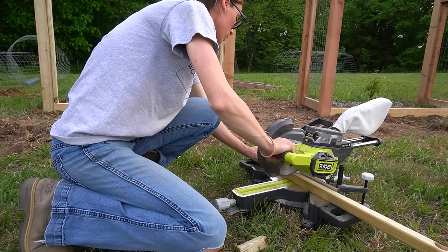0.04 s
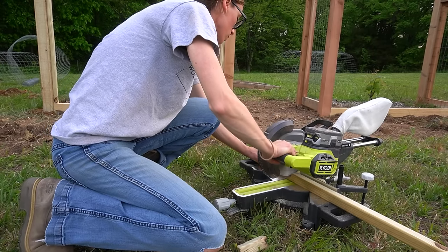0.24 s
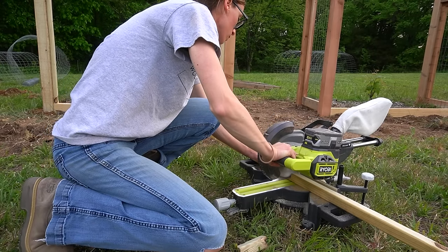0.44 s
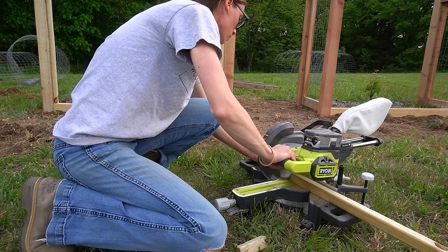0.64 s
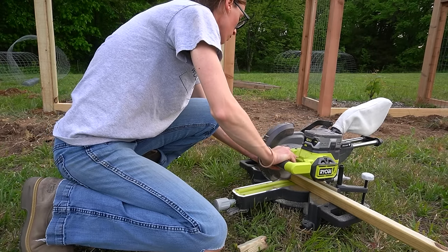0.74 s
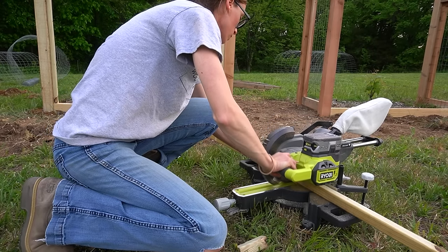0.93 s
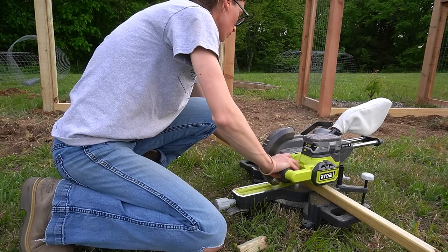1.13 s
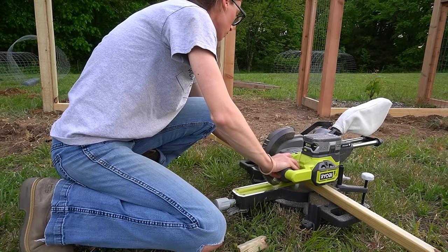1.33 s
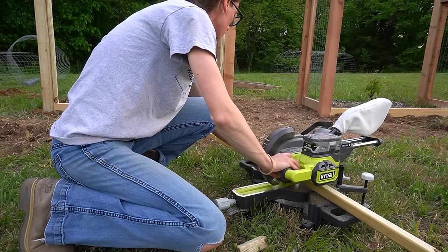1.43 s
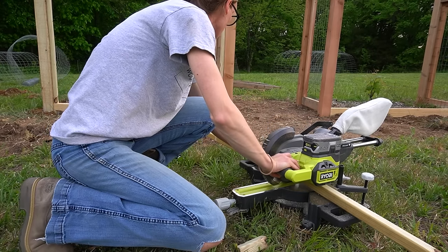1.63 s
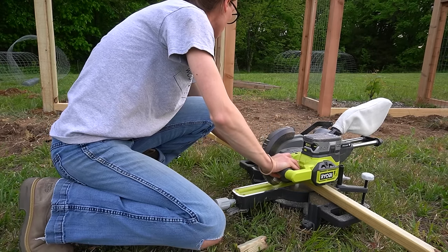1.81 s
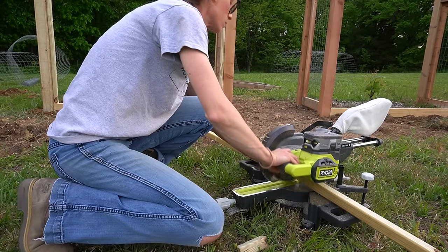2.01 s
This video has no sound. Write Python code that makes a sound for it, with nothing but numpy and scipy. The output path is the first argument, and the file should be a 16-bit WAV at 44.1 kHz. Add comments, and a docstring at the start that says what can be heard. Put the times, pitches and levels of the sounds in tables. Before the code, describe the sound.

Miter saw finishing a cut in wood, harsh and hissy, then spinning down with a fluttering, descending whine

```python
"""On a lawn, a miter saw cuts through a wooden batten while a distant engine hums.
Chip noise modulated by the teeth makes the rasp; resonated noise makes the blade ring.
Free of the wood the saw speeds up, the trigger clicks off, and the whine (harmonics of the tooth rate)
falls through the resonances of blade and guard while the blade flutters against the kerf."""
import sys
import numpy as np
from scipy import signal
from scipy.fft import rfft, irfft, next_fast_len
from scipy.io import wavfile

SR = 44100
rng = np.random.default_rng(int(sys.argv[2]) if len(sys.argv) > 2 else 0)


def to_wav(s):
    """Save 16-bit WAV."""
    ch = np.atleast_2d(s).T  # columns
    pcm = np.round(np.clip(ch, -1, 1) * 32767)  # PCM
    wavfile.write(sys.argv[1], SR, pcm.astype(np.int16))


N = 90978
T = np.arange(N) / SR
SIZE = next_fast_len(N + 4096)
F = np.maximum(np.arange(SIZE // 2 + 1) * SR / SIZE, 1)
CUT_END_S = 0.97


def undb(db):
    """Decibels to gain."""
    return 10 ** (np.asarray(db) / 20)


def unit(x):
    """Scale to rms 1."""
    return x / np.sqrt(np.mean(x ** 2))


def curve(rows, axis=1):
    """One column of a table, joined by straight lines in time."""
    rows = np.array(rows)
    return np.interp(T, rows[:, 0], rows[:, axis])


def across(rows):
    """Points joined on a log-frequency axis."""
    rows = np.array(rows)
    return np.interp(np.log(F), np.log(np.maximum(rows[:, 0], 1)), rows[:, 1])


def shape(x, gain):
    """Filter with a gain for each frequency."""
    return irfft(rfft(x, SIZE) * gain, SIZE)[..., :N]


def noise():
    """White noise."""
    return rng.standard_normal(N)


def walk(rate_hz):
    """Smooth chance of spread 1: low-passed noise."""
    return unit(shape(noise(), 1 / (1 + (F / rate_hz) ** 4)))


def resonance(hz, width_hz):
    """Gain of one resonance, 1 at its centre."""
    return 1 / np.hypot(1, (F / hz - hz / F) * hz / width_hz)


def ringing(hz, width_hz):
    """A mode kept ringing by random knocks, rms 1."""
    return unit(shape(noise(), resonance(hz, width_hz) ** 2))


def after(start_s):
    """Seconds since a moment, 0 before it."""
    return np.maximum(T - start_s, 0)


def tone(phase):
    """Sinusoid of rms 1."""
    return np.sqrt(2) * np.cos(phase)


# engine lines: pitch_hz, relative_db
ENGINE_LINES = [(57.5,-12.5),(86,-8.5),(113.2,2.5),(144.5,-8.5),(173,-38),(222.5,-4),(229,-17)]
# hum level: time_s, level_db
HUM_LEVEL = [(0,-75.5),(.95,-75.5),(1.4,-68.5),(1.8,-65.5),(2.06,-62.5)]
# outdoor noise colour: freq_hz, relative_db
OUTDOOR_COLOUR = [(25,-22.5),(70,6),(130,4.5),(230,7.5),(400,-6),(600,-16.5),(850,-8),(1500,-7),(5000,-27),(15000,-54)]
OUTDOORS_RE_HUM_DB = -9.5
THROB_HZ, THROB_PEAK_S, THROB_DEPTH = 4.65, 1.782, 0.65


def distance():
    """A far engine: throbbing steady lines, over soft outdoor noise that rises with the hum."""
    throb_growth = np.clip(T / THROB_PEAK_S, 0, 1)
    throb = 1 + THROB_DEPTH * np.cos(2 * np.pi * THROB_HZ * (T - THROB_PEAK_S)) * throb_growth
    lines = 0
    for hz, db in ENGINE_LINES:
        phase = 2 * np.pi * (hz * T + rng.random()) + 0.1 * walk(5.15)
        lines = lines + undb(db) * np.cos(phase)
    hum = unit(throb * lines)
    outdoors = unit(shape(noise(), undb(across(OUTDOOR_COLOUR))))
    return (hum + undb(OUTDOORS_RE_HUM_DB) * outdoors) * undb(curve(HUM_LEVEL))


# motor speed under load: time_s, speed_turns_per_s
LOADED_SPEED = [(0.0, 403), (0.17, 391), (0.362, 354.8), (0.448, 353.2), (0.486, 343.5), (0.82, 344.4),
                (0.928, 327.2), (0.944, 313.2), (0.97, 311.6)]
# motor speed, blade free: time_s, speed_turns_per_s
FREE_SPEED = [(0.99,315.3),(1.058,356),(1.126,385),(1.188,359.3),(1.4,265.5),(1.53,215.7),(1.6,193),(1.668,170.5),(1.73,152),(1.784,135.5),(1.836,120.3),(1.9,103.8),(1.94,96),(2.06,73)]
WAVER = 0.0015  # rms share of speed


def motor():
    """Turns per second: the speed changes by a steady share each second from point to point."""
    rows = np.array([*LOADED_SPEED, *FREE_SPEED])
    speed = np.exp(np.interp(T, rows[:, 0], np.log(rows[:, 1])))
    return speed * (1 + WAVER * walk(51))


REPEAT_SPREAD_DB, REPEAT_DRIFT_HZ = 4, 2.5


def tooth_pattern(sector):
    """Uneven teeth repeat each half sector: a comb following the speed, each line's level drifting at random."""
    comb = 0
    for k in range(6, 52):
        swell = undb(REPEAT_SPREAD_DB * walk(REPEAT_DRIFT_HZ)) / np.sqrt(k)
        comb = comb + swell * np.cos(2 * k * sector + 2 * np.pi * rng.random())
    return unit(comb)


# chip noise colour: freq_hz, relative_db
CHIP_COLOUR = [(180, -59), (300, -60), (477, -63.5), (519, -30), (573, -36), (665, -25.5), (825, -5.5),
               (1010, -21.5), (1150, -19.5), (1230, -4), (1360, -9), (1450, -8.5), (1770, -15.5),
               (2090, -9), (2470, -5), (3400, -5), (3660, -5.5), (3860, 0), (4410, -3), (4710, -3),
               (5740, -2), (6890, -2), (7490, 0), (9140, -2), (11700, 3), (15800, -5.5)]
TEETH_PER_SECTOR = 10
BITE_SHARE, BITE_SPREAD_DB, WOBBLE = 0.08, 1.08, 0.087
SPRAY_DB, REPEAT_DB = -4, -3.5  # re shared chip noise


def chip_noise(tooth):
    """Each tooth tears off a burst of chips; part of the pattern repeats with the blade's sectors. Stereo."""
    sector = tooth / TEETH_PER_SECTOR
    bite = (1 + BITE_SHARE * np.cos(tooth)) * undb(BITE_SPREAD_DB * walk(510))
    bite = bite * (1 + WOBBLE * (np.cos(sector) + np.cos(sector / 4)))
    spray = undb(SPRAY_DB) * np.array([noise(), noise()])  # independent left and right
    source = noise() + spray + undb(REPEAT_DB) * tooth_pattern(sector)
    return shape(source * bite, undb(across(CHIP_COLOUR)))


# blade modes: centre_hz, relative_db
BLADE_MODES = [(3881,-69),(4732,-50.5),(5949,-53),(7262,-66),(7477,-58.5),(9722,-58),(10724,-55)]


def blade_modes():
    """Random knocks keep the blade's modes ringing: narrow-band noise."""
    return sum(undb(db + 1.5) * ringing(hz, width_hz=51) for hz, db in BLADE_MODES)


# low bending modes: centre_hz, width_hz, relative_db
BENDING_MODES = [(800, 12, -0.5), (853, 7.3, -1.5), (830, 160, -1)]
# their summed level: time_s, level_db
BENDING_CURVE = [(0.0, -57.5), (0.168, -72.5), (0.422, -60.5), (0.48, -84), (0.526, -61), (0.778, -62.5),
                 (0.9, -51.5), (1.036, -72), (1.16, -101)]


def bending():
    """Low bending modes of the blade, rung by random knocks."""
    modes = unit(sum(undb(db) * ringing(hz, width_hz) for hz, width_hz, db in BENDING_MODES))
    tail_db = -60 * after(BENDING_CURVE[-1][0])  # 60 dB/s past the last point
    return modes * undb(curve(BENDING_CURVE) + tail_db)


# high scrape: time_s, level_db
SCRAPE_LEVEL = [(0,-44),(.14,-38.5),(.3,-42),(.55,-65),(.95,-56),(1.02,-100)]


def scrape():
    """A high scrape, strongest early in the cut: one band of resonated noise."""
    return ringing(11690, width_hz=390) * undb(curve(SCRAPE_LEVEL))


# cut bands before trim and end fall: time_s, hiss_db, rasp_db, body_db
CUT_BANDS = [(0.0,-33,-48,-52),(0.15,-35,-50.5,-59.5),(0.262,-36,-45,-61.5),(0.34,-34,-44.5,-51.5),(0.426,-34.5,-38.5,-55),(0.45,-33.5,-46,-53.5),(0.588,-33.5,-42,-50.5),(0.68,-33,-45,-47.5),(0.756,-33.5,-43.5,-51.5),(0.86,-32.5,-43,-46),(0.9,-37.5,-43.5,-51.5),(0.93,-33,-40.5,-46.5),(0.97,-37,-39.5,-51.5)]
BODY_TOP_HZ, RASP_TOP_HZ = 2300, 4730
HISS_TRIM_DB, RASP_TRIM_DB = -0.12, -1
HISS_FALL_DB_PER_S, RASP_FALL_DB_PER_S = 526, 197


def cut(tooth):
    """Chip noise in three bands with separate levels, plus ringing blade and scrape."""
    chips = chip_noise(tooth)
    below_hiss = 1 / (1 + (F / RASP_TOP_HZ) ** 8)
    below_rasp = 1 / (1 + (F / BODY_TOP_HZ) ** 8)
    rasp_fall_db = RASP_FALL_DB_PER_S * after(CUT_END_S)
    hiss_level = undb(curve(CUT_BANDS) - HISS_FALL_DB_PER_S * after(CUT_END_S))
    rasp_level = undb(curve(CUT_BANDS, axis=2) - rasp_fall_db)
    body_level = undb(curve(CUT_BANDS, axis=3) - rasp_fall_db)
    hiss = undb(HISS_TRIM_DB) * hiss_level * unit(shape(chips, 1 - below_hiss))
    rasp = undb(RASP_TRIM_DB) * rasp_level * unit(shape(chips, below_hiss - below_rasp))
    body = body_level * unit(shape(chips, below_rasp))
    mean_hiss = undb(np.mean(np.array(CUT_BANDS)[:, 1]))
    modes = blade_modes() * hiss_level / mean_hiss  # modes follow the hiss
    return hiss + rasp + body + modes + bending() + scrape()


# strike tone: time_s, level_db
STRIKE_LEVEL = [(0,-75),(.2,-54.5),(.32,-60),(.5,-58),(.68,-48),(.86,-52),(.95,-68),(1.02,-90),(1.1,-100)]
# harmonics 1 up: relative_db
STRIKE_STACK = [-2, -31.5, -19, -5.5]


def strike(tooth):
    """Teeth strike the wood at the tooth rate: a clear tone inside the rasp."""
    stack = sum(undb(db + 2 * walk(6.3)) * tone(k * tooth) for k, db in enumerate(STRIKE_STACK, 1))
    return undb(curve(STRIKE_LEVEL)) * stack


# flutter against the kerf: time_s, rate_hz, depth_0_to_1
FLUTTER_CURVE = [(1.1,150,.05),(1.22,146,.55),(1.29,136,.5),(1.35,125,.7),(1.4,122,.8),(1.44,122,.2),(1.6,100,.08),(2.06,70,.05)]
FLUTTER_PEAK_S, FLUTTER_UNEVEN = 1.36, 0.12


def flutter_beat():
    """Phase and depth of the blade's flutter, a crest set at FLUTTER_PEAK_S."""
    beat = 2 * np.pi * np.cumsum(curve(FLUTTER_CURVE)) / SR
    return beat - np.interp(FLUTTER_PEAK_S, T, beat), curve(FLUTTER_CURVE, axis=2)


def flutter():
    """Gain as the free blade flutters against the kerf, uneven over each four beats."""
    beat, depth = flutter_beat()
    uneven = 1 + 2 * FLUTTER_UNEVEN * depth * np.cos(beat / 4)
    return (1 + depth * np.cos(beat)) * uneven / np.sqrt(1 + depth ** 2 / 2)


# second-harmonic squeals: start_s, length_s (edge_s more end to end), level_db (if fully risen)
SQUEAL_EVENTS = [(0.917,0.013,-35.5),(0.944,0.022,-35),(1.142,0.0052,-36.5),(1.149,0.048,-46)]


def squeals(tooth, edge_s=0.012):
    """The second tooth harmonic bursts out briefly."""
    level = 0
    for start_s, length_s, db in SQUEAL_EVENTS:
        nearest_end_s = np.minimum(T - start_s, start_s + length_s + edge_s - T)
        level = level + undb(db) * np.clip(nearest_end_s / edge_s, 0, 1)
    return level * tone(2 * tooth) * (1 + 0.079 * walk(130))


# whine gain: time_s, gain_db
WHINE_GAIN = [(.9,-54),(1.0,-36.5),(1.1,-33.5),(1.15,-33),(1.22,-36.5),(1.3,-37.5),(1.4,-37.5),(1.45,-40.5),(1.53,-45),(1.63,-49),(1.68,-52.5),(1.82,-58.5),(1.91,-59),(1.98,-66.5),(2.06,-76)]
# harmonics 1-6: relative_db
LOW_HARMONICS = [-8, 0, -1, 5, -1, 7]
# blade and guard response: freq_hz, gain_db
GUARD_RESPONSE = [(250,-9),(390,-8),(520,-5),(680,-25.5),(800,-16.5),(950,-30.5),(1200,-27),(1450,-21),(1700,-16.5),(1950,-17),(2250,-28.5),(2550,-28.5),(2950,-12),(3400,-23.5),(4000,-18),(4700,-26.5),(5400,-18.5),(6000,-21.5),(6500,-37.5),(7000,-21.5),(7600,-28.5),(8300,-36.5),(9100,-28),(10000,-30),(10800,-47),(12300,-42),(15000,-61)]
UPPER_DB, ROLL_OFF_DB_PER_HARMONIC = -1, 0.3
ROUGHNESS, LINE_WIDTH_HZ = 0.5, 50  # width of harmonic 1, grows as sqrt(k)
FLUTTER_SWING_RAD, PATCHY_DB, PATCHY_HZ = 0.42, 2.2, 11


def whine(tooth):
    """Tooth harmonics sweep through guard resonances; flutter splits each into a cluster of lines."""
    beat, depth = flutter_beat()
    upper = UPPER_DB - ROLL_OFF_DB_PER_HARMONIC * np.arange(20)
    stack = 0
    for k, db in enumerate([*LOW_HARMONICS, *upper], 1):
        width_hz = LINE_WIDTH_HZ * np.sqrt(k)
        swing = FLUTTER_SWING_RAD * np.sqrt(k) * depth * np.sin(beat + 2 * np.pi * rng.random())
        phase = k * tooth + 2 * np.pi * rng.random() + swing
        in_phase = (1 + ROUGHNESS * walk(width_hz)) * np.cos(phase)
        quadrature = ROUGHNESS * walk(width_hz) * np.sin(phase)
        stack = stack + undb(db + PATCHY_DB * walk(PATCHY_HZ)) * (in_phase + quadrature)
    stack = shape(stack, undb(across(GUARD_RESPONSE)))
    return stack * undb(curve(WHINE_GAIN)) * flutter() + squeals(tooth)


# air stirred by the free blade: time_s, level_db (before flutter)
AIR_LEVEL = [(.9,-49),(.99,-42.5),(1.1,-48),(1.2,-50),(1.38,-52.5),(1.45,-60),(1.55,-57),(1.68,-62),(1.82,-68.5),(1.91,-69),(1.98,-82.5),(2.06,-82)]
# its colour: freq_hz, relative_db
AIR_SPECTRUM = [(250,-23),(600,-27),(900,-22.5),(1200,-14),(1700,-3),(2250,1),(2950,3.5),(3400,1.5),(4700,-3.5),(5400,-1.5),(6500,-0.5),(7600,-2),(8300,-7),(10000,-11.5),(10800,-23),(12300,-19),(15000,-30.5)]


def stirred_air():
    """Air rushes round the fluttering blade: coloured noise."""
    return unit(shape(noise(), undb(across(AIR_SPECTRUM)))) * flutter() * undb(curve(AIR_LEVEL))


# free-blade ring: time_s, pitch_hz, level_db
FREE_RING = [(.95,1935,-88),(.99,1925,-52),(1.15,1912,-54),(1.3,1939,-57.5),(1.45,1975,-61),(1.65,2014,-71),(2.06,2047,-81)]
# lowest bending mode, clear as the teeth leave the wood: time_s, level_db
CLEAR_RING_LEVEL = [(.8,-76.5),(.95,-54),(1.04,-62),(1.1,-72),(1.16,-100),(2.06,-140)]


def free_ring():
    """The blade rings on: a wavering tone, a high noisy ring and a clear low bending mode."""
    pitch_hz = curve(FREE_RING) * (1 + 0.01124 * walk(62))
    ring = tone(2 * np.pi * np.cumsum(pitch_hz) / SR) * undb(curve(FREE_RING, axis=2) + 2 * walk(30))
    high_db = -65 - 13 * after(CUT_END_S)  # falls 13 dB/s
    high = ringing(5400, width_hz=450) * undb(high_db)
    clear = tone(2 * np.pi * 797 * T) * undb(curve(CLEAR_RING_LEVEL))
    return ring + high + clear


# switch click: start_s, noise_gain_db, decay_s
TRIGGER_CLICK = (1.1268, -31, .0022)


def trigger():
    """The switch snaps open: a decaying noise burst through one broad resonance."""
    start_s, db, decay_s = TRIGGER_CLICK
    burst = noise() * (T >= start_s) * np.exp(-np.abs(T - start_s) / decay_s)
    return undb(db) * shape(burst, resonance(4110, width_hz=7800) ** 2)


# microphone pair: freq_hz, right_minus_left_db
PAN_CURVE = [(200,0),(700,0),(1300,4),(2400,6),(4400,3),(8000,2.5),(15000,4.5)]
# microphone pair: freq_hz, left_lead_rad
LEAD_CURVE = [(250,-0.07),(1000,-0.76),(2500,0.31),(6630,-0.23),(6980,-1.3),(7240,-0.23),(9130,-1.25),(10200,1),(10400,-1.44),(12200,-1.52),(12600,-1.1),(13500,0.34),(14000,-2.3),(15400,0.5)]
# scattered sound: freq_hz, re_direct_db
SCATTER_SHARE = [(300,-29),(1000,-12),(2500,-15.5),(6000,-7),(14000,-8.5)]
TEETH_PER_TURN, SCATTER_DECAY_S = 4, 0.01  # per motor turn


def scene():
    """The saw reaches two microphones directly and scattered off its table and the ground."""
    far = distance()
    tooth = 2 * np.pi * TEETH_PER_TURN * np.cumsum(motor()) / SR
    saw = cut(tooth) + strike(tooth) + whine(tooth) + stirred_air() + free_ring() + trigger()
    share = undb(across(SCATTER_SHARE))
    out = []
    for side, sound in zip((1, -1), saw):  # left, right
        echoes = noise() * np.exp(-T / SCATTER_DECAY_S)
        echoes = echoes / np.sqrt(np.sum(echoes ** 2))
        path = (1 + share * rfft(echoes, SIZE)) / np.hypot(1, share)
        pan = undb(-side * across(PAN_CURVE) / 2)
        lead = np.exp(1j * side * across(LEAD_CURVE) / 2)
        out.append(far + shape(sound, path * pan * lead))
    return np.array(out)


def record(dry):
    """The recorder cuts the top: steep elliptic low-pass at 15950 Hz."""
    top_cut = signal.ellip(10, 0.2, 80, 15950, fs=SR, output="sos")
    return signal.sosfilt(top_cut, dry)


dry = scene()
out = record(dry)
to_wav(out)
```